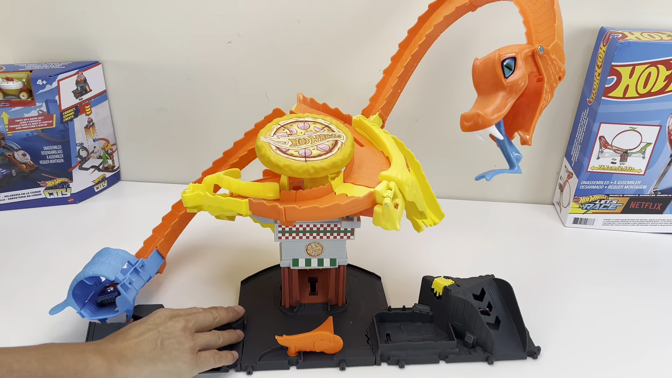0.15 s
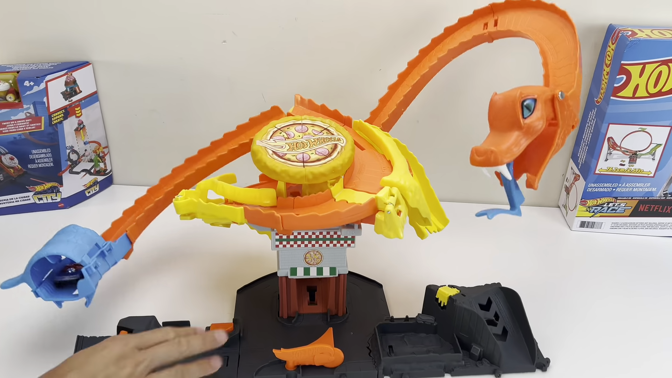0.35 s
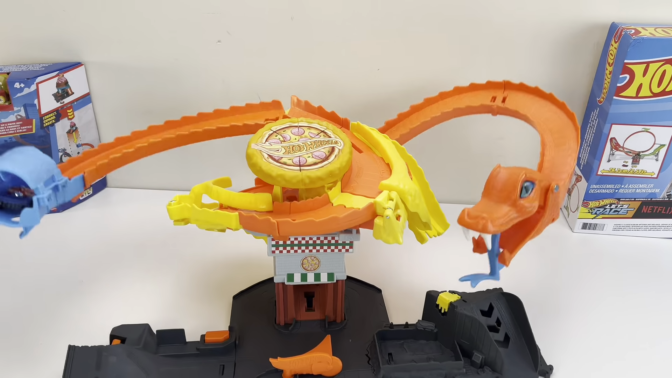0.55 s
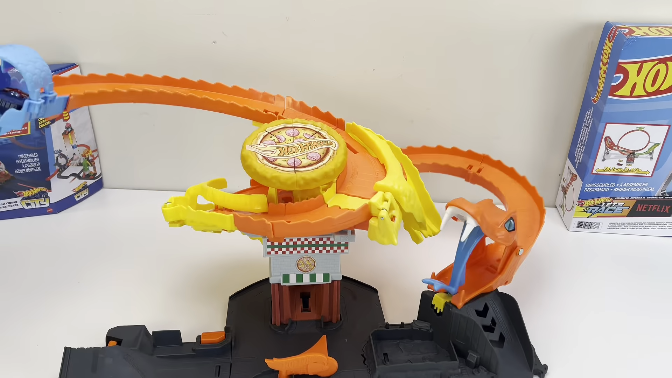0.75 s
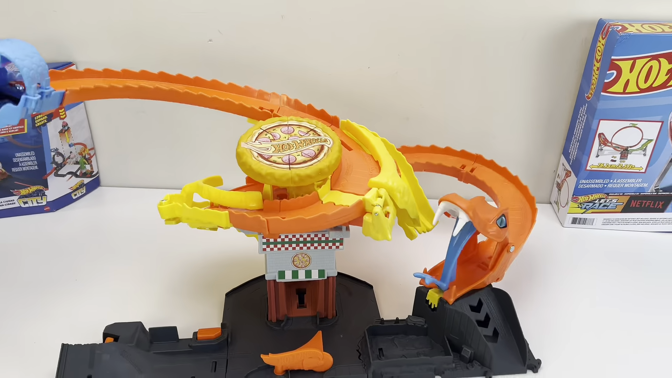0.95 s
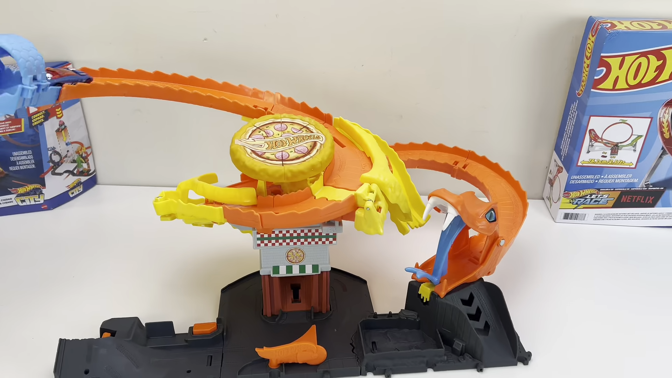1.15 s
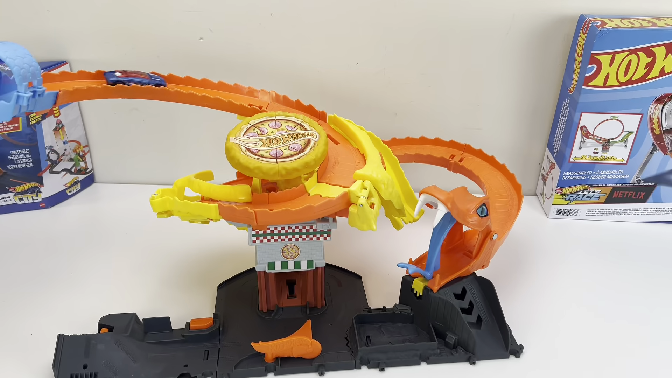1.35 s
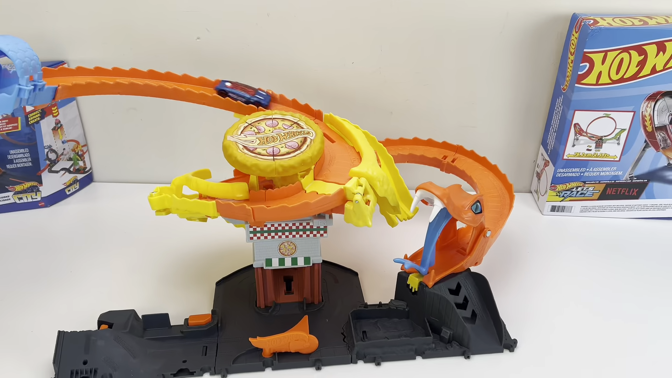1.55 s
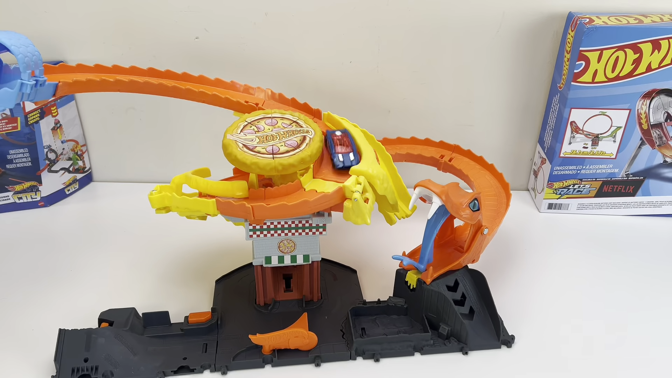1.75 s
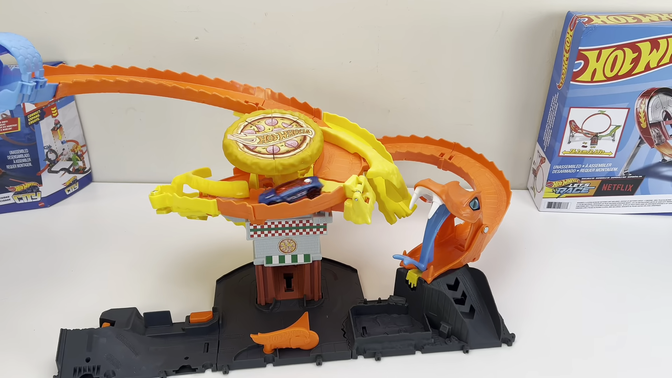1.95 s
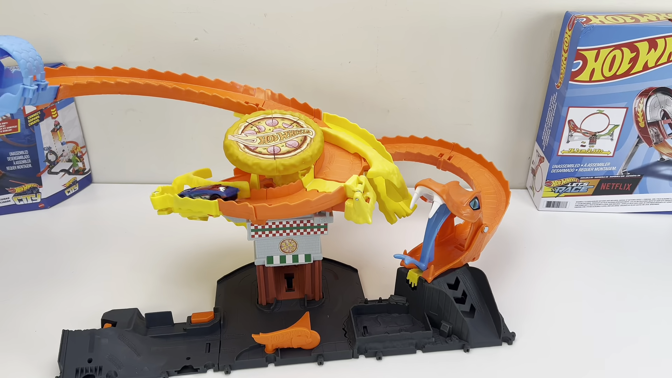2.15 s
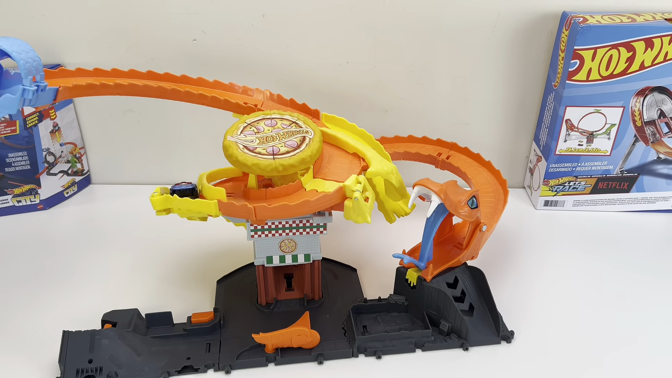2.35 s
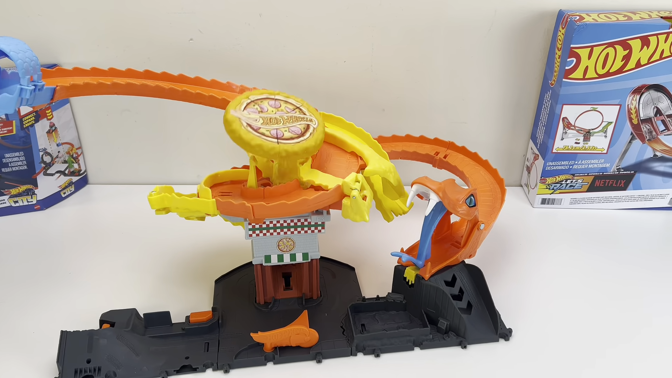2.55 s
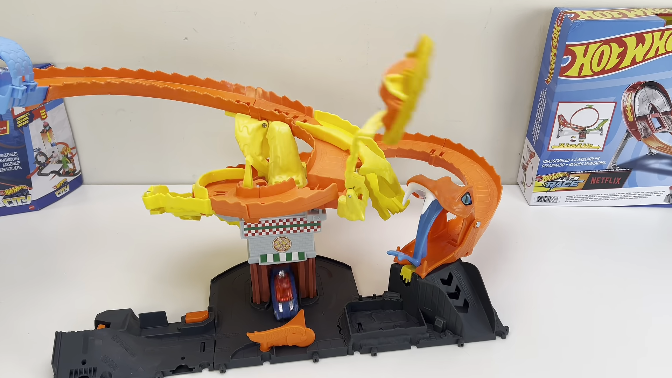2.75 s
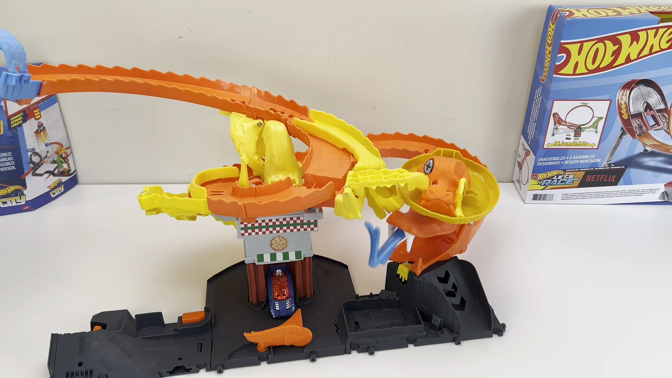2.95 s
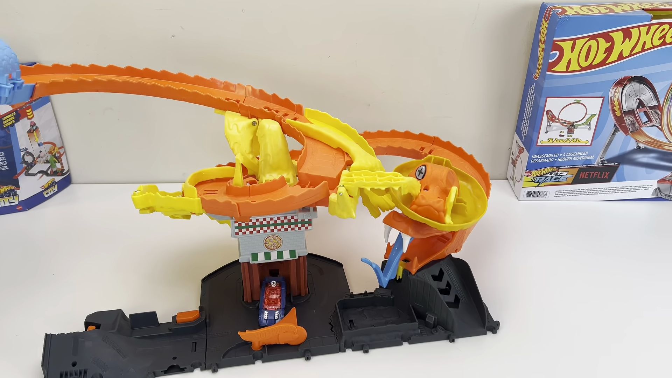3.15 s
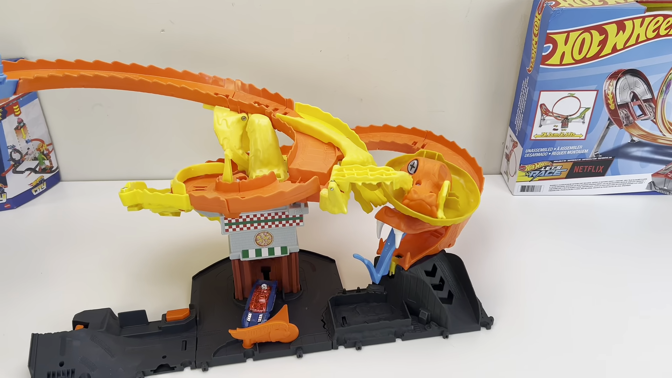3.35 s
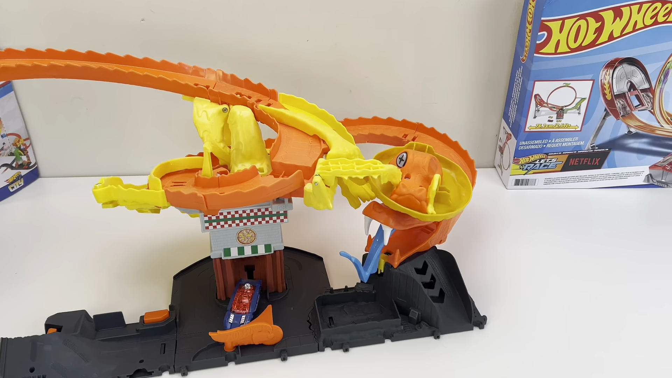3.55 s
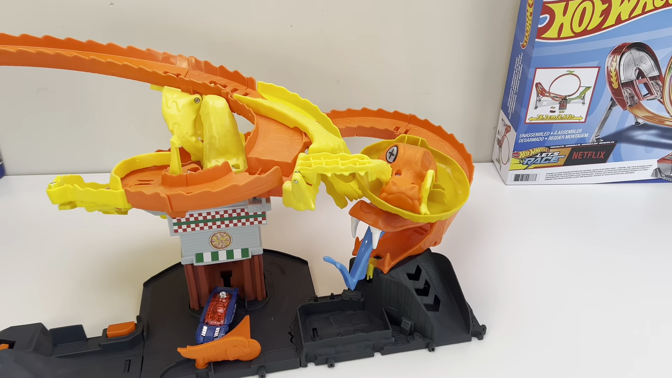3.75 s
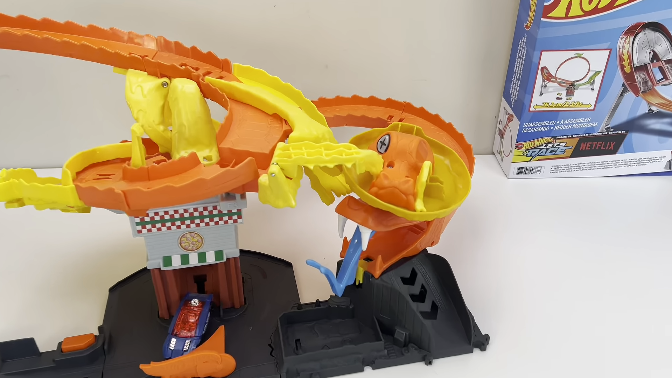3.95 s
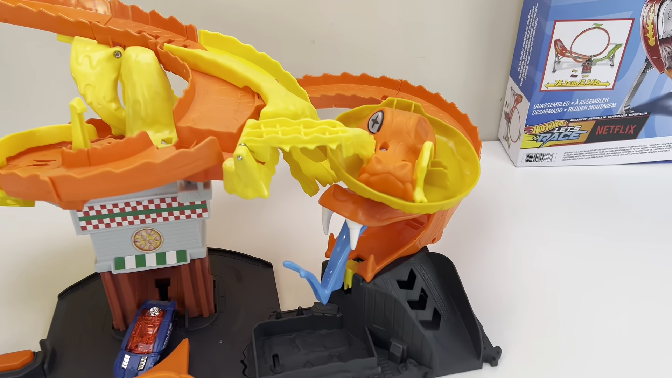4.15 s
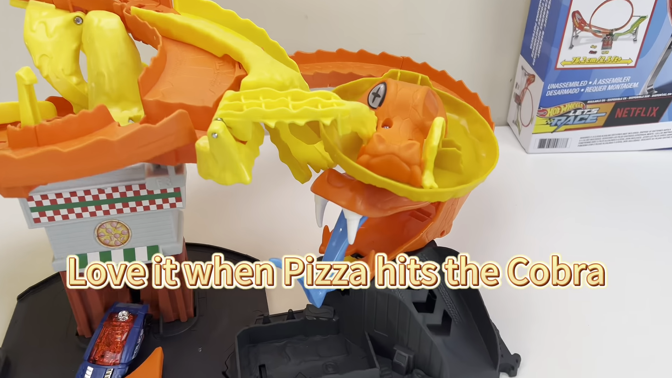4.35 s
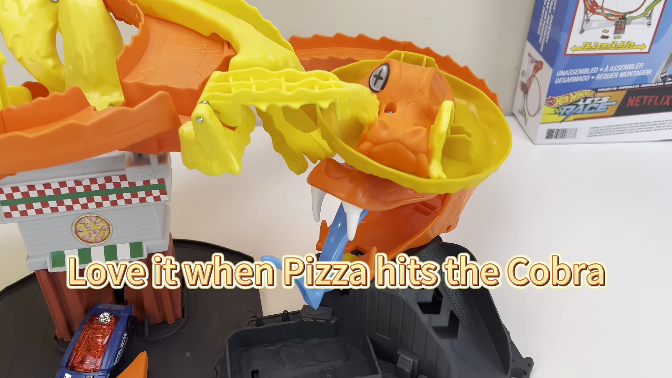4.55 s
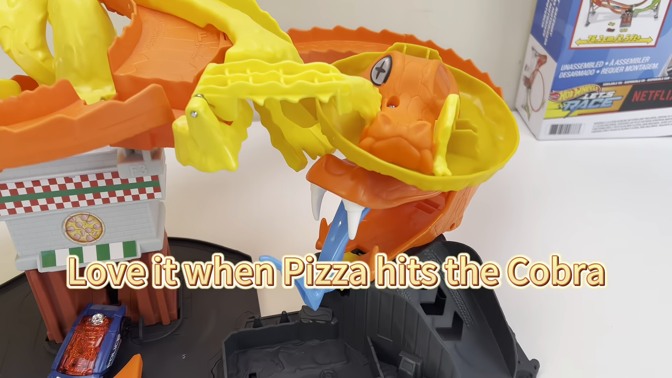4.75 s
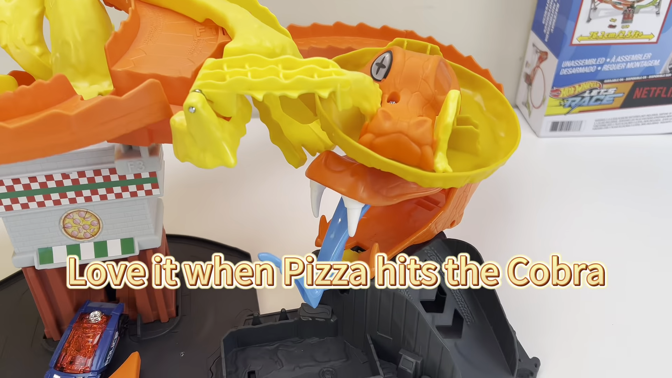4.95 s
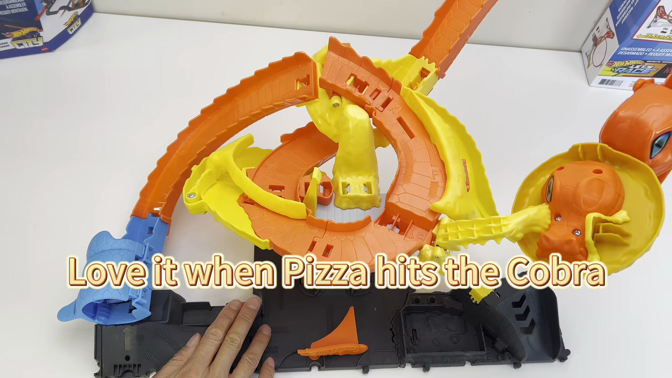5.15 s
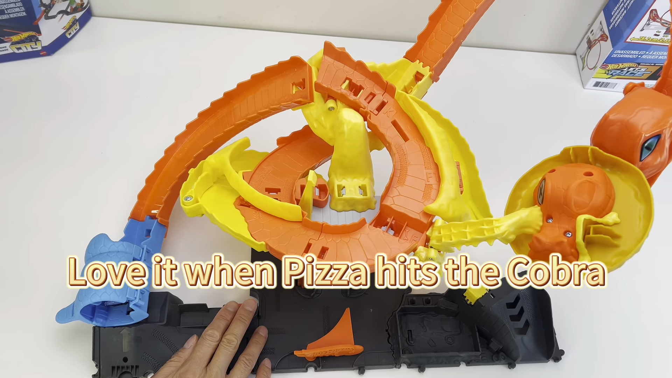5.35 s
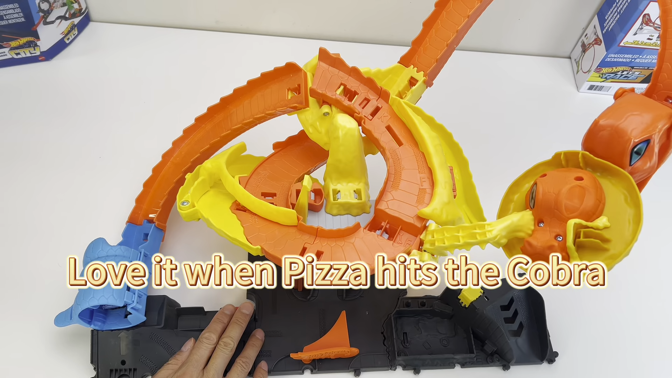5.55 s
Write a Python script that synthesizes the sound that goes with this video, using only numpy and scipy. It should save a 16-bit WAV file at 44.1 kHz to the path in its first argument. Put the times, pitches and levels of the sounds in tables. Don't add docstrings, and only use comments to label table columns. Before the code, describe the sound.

A plastic latch clicks, a hollow arm slams down, a small die-cast car rattles along plastic track, then a trap springs with a loud clatter.

```python
import sys
import numpy as np
from scipy import signal
from scipy.fft import rfft, irfft
from scipy.io import wavfile
from scipy.ndimage import uniform_filter1d

SR = 44100
rng = np.random.default_rng(int(sys.argv[2]) if len(sys.argv) > 2 else 0)


def voltage_ratio(decibels):
    exponent = np.asarray(decibels, float) / 20
    return 10 ** exponent


def waveform_to_disk(signal):
    frames = np.transpose(np.atleast_2d(signal))
    scaled = np.clip(frames, -1, 1) * 32767
    samples = np.round(scaled).astype(np.int16)
    wavfile.write(sys.argv[1], SR, samples)


N = 246078
TIME = np.arange(N) / SR


def curve(table, column=1):
    return np.interp(TIME, np.array(table)[:, 0], np.array(table)[:, column])


def along(points, size):
    hz = np.maximum(np.fft.rfftfreq(size, 1 / SR), 1)
    return np.interp(np.log(hz), np.log(np.array(points)[:, 0]), np.array(points)[:, 1])


def band(x, lo_hz, hi_hz, order=2):
    return signal.sosfilt(signal.butter(order, [lo_hz, min(hi_hz, .45 * SR)], "band", fs=SR, output="sos"), x)


def three_parts(x):
    hollow = band(x, 280, 1500)
    middle = -band(x, 1500, 4000)
    bright = band(band(x, 4000, 18000), 500, 13000, order=1)
    return hollow, middle, bright


def level(x, db=0):
    return x * voltage_ratio(db) / np.sqrt(np.mean(x ** 2))


def shaped_noise(spectrum):
    return irfft(rfft(rng.standard_normal(N)) * voltage_ratio(along(spectrum, N)), N)


def walk(rate_hz):
    hold = int(SR / rate_hz)
    steps = np.repeat(rng.standard_normal(N // hold + 1), hold)
    return 1.38 * uniform_filter1d(steps, hold)[:N]


def grit(size, spread_db):
    return rng.standard_normal(size) * voltage_ratio(spread_db * np.minimum(rng.exponential(size=size), 4.5))


# (start [s], wheel knock [dB], track rumble [dB], left minus right [dB])
STAGES = [
    (0.0, -7, 4, 3.5),
    (0.5, -11.5, 2, 3.5),
    (1.12, -1, -11.5, 4),
    (1.69, -13, -6.5, 3),
    (2.15, -20.5, -4, 3.5),
    (2.799, -14.5, 3.5, 4),
    (3.4, -15, 11, 12),
    (5.0, -14, 3, 7),
]


def stage(column):
    rows = np.array(STAGES)
    now = np.maximum(np.searchsorted(rows[:, 0], TIME, "right") - 1, 0)
    return uniform_filter1d(rows[now, column], size=int(.04 * SR) + 1)


# (frequency [Hz], density [dB per Hz])
HUM = [(18, -46), (30, -19), (59, -9), (90, -12), (124, -8), (280, -23), (584, -27.5), (822, -24),
       (1280, -28.5), (1460, -30), (2540, -31.5), (2900, -34.5), (16000, -51.5)]


def hum():
    mid = shaped_noise(HUM)
    side = 1.1 * band(shaped_noise(HUM), 300, 16000, order=1)
    settle_db = np.interp(TIME, [4.3, 4.6], [3.0, 0])
    return level(mid + side * np.array([[1], [-1]]), -64) * voltage_ratio(.6 * walk(14) + settle_db)


def room(x):
    t60_s, onset_s, shared, room_db = 0.36, 0.0057, 0.27, -11.5
    t = TIME[:SR]
    tails = rng.standard_normal((2, SR)) * np.exp(-np.log(1000) * t / t60_s) * np.minimum(t / onset_s, 1)
    tails = tails + shared * tails[::-1]
    tails = band(tails, 200, 6500, order=1) + 0.34 * tails * np.exp(-t / .08)
    return signal.fftconvolve(x[None], level(tails, room_db) / np.sqrt(SR), axes=1)[:, :N]


def near_echoes(x, echo_db):
    scatter = rfft(rng.standard_normal((2, 512)) * np.exp(-TIME[:512] / .002))
    allpass = irfft(scatter / np.abs(scatter))
    first, second = signal.fftconvolve(x[None], allpass, axes=1)[:, :N]
    angle_rad = 2.37 * walk(8.8)
    echo = band(first * np.cos(angle_rad) + second * np.sin(angle_rad), 1300, 14000, order=1)
    return voltage_ratio(echo_db) * echo * np.array([[1], [-1]])


# (loudest [s], mode [dB], wobble [dB], 60 dB decay [s])
TABLE = [(0.17, -54, -53.5, 0.21), (0.33, -46, -55, 0.25), (0.56, -47.5, -55.5, 0.23),
         (0.7, -28, -39.5, 0.16), (0.842, -29.5, -39.5, 0.28), (0.93, -37, -41.5, 0.14),
         (1.14, -52, -61.5, 1.8), (1.8, -60, -52.5, 1.1), (1.97, -41, -49.5, 0.5),
         (2.27, -45.5, -48.5, 0.44), (2.57, -40, -48, 0.23), (2.94, -23, -38, 0.22),
         (3.08, -37, -53.5, 0.51), (5.58, -49, -55, .3)]


def table_top():
    mode_hz, swell_db_per_s = 118, 331
    drifting_hz = mode_hz * (1 + 0.028 * walk(25))
    mode = np.sqrt(2) * np.sin(2 * np.pi * np.cumsum(drifting_hz) / SR)
    wobble = level(band(rng.standard_normal(N), 50, 140, order=3))
    wobble = wobble + level(band(rng.standard_normal(N), 160, 360))
    s, mode_db, wobble_db, decay_s = np.array(TABLE).T[:, :, None]
    late_s = TIME - s
    fall_db = np.where(late_s < 0, swell_db_per_s * late_s, -60 * late_s / decay_s)
    mode_gain = voltage_ratio((mode_db + fall_db).max(axis=0))
    wobble_gain = voltage_ratio((wobble_db + 0.38 * fall_db).max(axis=0))
    return mode_gain * mode + wobble_gain * wobble


def ringing(modes, widen, crack_db, detune):
    t = TIME[:4000]
    hz, width_hz, db = np.array(modes).T[:, :, None]
    hz = hz * (1 + detune * rng.standard_normal(hz.shape))
    width_hz = np.maximum(widen * width_hz, 110)
    ring = voltage_ratio(db) * np.sqrt(width_hz) * np.exp(-np.pi * width_hz * t) * np.cos(2 * np.pi * hz * t)
    return level(ring.sum(axis=0)) + level(1. * (t == 0), crack_db)


def blows(table, modes, widen, crack_db, ring_hz=1018, spot_hz=130):
    out, t = np.zeros(N + 12000), TIME[:6000]
    spot_db = max(mode[2] for mode in modes) + 3
    modes = list(modes) + [(ring_hz, spot_hz / widen, spot_db)]
    onset = np.minimum(t / .0012, 1)
    for s, peak_db, hollow_db, bright_db, chatter_ms in table:
        fade = np.exp(-(1000 * t / max(chatter_ms, 1)) ** 2) + .33 * np.exp(-t / 0.038)
        answer = ringing(modes, widen, crack_db, .015)
        parts = three_parts(signal.fftconvolve(grit(len(t), 3.5) * fade * onset, answer))
        peaks = [np.sqrt(uniform_filter1d(p ** 2, size=150).max()) for p in parts]
        mix = sum(voltage_ratio(db) * p / peak for p, peak, db in zip(parts, peaks, (hollow_db, 0, bright_db)))
        at = int(s * SR)
        out[at:at + len(mix)] += voltage_ratio(peak_db - 8.5) * mix
    return out[:N]


def knocks(table, modes, widen, crack_db, chatter_ms):
    out = np.zeros(N)
    for s, peak_db, hollow_db, bright_db, ring_hz in table:
        blow = (s, peak_db, hollow_db, bright_db, chatter_ms)
        out = out + blows([blow], modes, widen, crack_db, ring_hz)
    return out


# (frequency [Hz], width [Hz], level [dB])
LATCH_RING = [(870, 24, -21.5), (1080, 83, -14.5), (1210, 12, -3), (1630, 16, 1), (2720, 43, -8.5),
              (4070, 80, -14), (4860, 76, 7.5), (6030, 16, -15.5)]
# (time [s], peak [dB], hollow part [dB], bright part [dB], chatter [ms])
LATCH = [
    (0.0253, -60, 24, -33, 12.4),
    (0.1067, -29.5, -0.5, -12, 7.4),
    (0.1379, -35, 6.5, -11, 33),
    (0.277, -44.5, 7, -23, 44),
    (0.2963, -22, 6.5, -5.5, 14),
    (0.5325, -47.5, 6, -5.5, 81),
    (0.5632, -25, -10.5, -2, 6.7),
]


def latch():
    return blows(LATCH, LATCH_RING, 4.0, 0, ring_hz=1080, spot_hz=420)


# (time [s], peak [dB], hollow part [dB], bright part [dB], strongest ring [Hz])
HAND = [
    (3.3238, -48, 4, -30, 442.4),
    (5.4909, -56.5, -2, -6.5, 2800),
    (5.5575, -59, 7, -25, 450),
]
# (time [s], peak [dB], hollow part [dB], bright part [dB], strongest ring [Hz])
FURTHER_TAPS = [
    (3.515, -72, 3, -18, 900),
    (3.996, -63, -3, -8, 700),
    (5.272, -66, -15, -20, 3200),
]
# (time [s], peak [dB], hollow part [dB], bright part [dB], chatter [ms])
RUSTLE = [
    (5.198, -74, -2, -1, 45),
    (5.485, -66, -10, -2, 90),
]
# (frequency [Hz], width [Hz], level [dB])
BOWL_RING = [(1020, 170, -3), (1670, 510, 1.5), (2400, 30, 2), (3900, 121, -11), (3873, 23, -4),
             (4430, 27, -22), (5050, 87, -10), (6160, 120, -3.5), (6760, 39, -12)]


def hand():
    return knocks(HAND + FURTHER_TAPS, LATCH_RING, 6.45, -1.8, 4.6) + blows(RUSTLE, BOWL_RING, 6.0, 13)


# (frequency [Hz], width [Hz], level [dB])
ARM_RING = [(355, 32, -17), (480, 50, 17.5), (750, 79, 9), (1000, 17, 21.5), (1260, 31, -15.5),
            (1620, 37, -13.5), (2300, 68, -6), (2940, 60, -20.5), (4700, 300, -17)]
# (time [s], peak [dB], hollow part [dB], bright part [dB], chatter [ms])
SLAM = [(0.6524, -12, 8.5, -2, 19.1), (0.6674, -17, -30, -11, 12), (0.6994, -34, -15, -13.5, 19),
        (0.7354, -38.5, -1, -9, 6.7), (0.7604, -34.5, 7, -4, 5.3), (0.7856, -28, -3, 2.5, 6),
        (0.8011, -22, 5, 0.5, 11), (0.8174, -18.5, -1.5, -15.5, 13), (0.8314, -21.5, 3, -9, 15),
        (0.8694, -32.5, 12.5, -14, 19), (0.9244, -50, -5, -15, 6.3), (0.962, -28.5, -6, -7, 15.5),
        (0.9914, -62.5, 21, -5, 7)]


def arm():
    first = blows(SLAM[:3], ARM_RING, 2.2, 1.5, ring_hz=2520)
    bounces = blows(SLAM[3:], ARM_RING, 2.2, 1.5, spot_hz=250)
    return first + bounces


# (frequency [Hz], width [Hz], level [dB])
TRAP_RING = [(1010, 24, -3.5), (1750, 95, -6), (1982, 19, -17), (2510, 170, 12.5), (2660, 19, -20),
             (2982, 29, 6.5), (4100, 62, 4.5), (5270, 100, 11.5), (7840, 110, -22.5)]
# (time [s], peak [dB], hollow part [dB], bright part [dB], strongest ring [Hz])
TRAP = [(2.7671, -40, -13.5, 7, 1420), (2.7824, -29.5, -1.5, 7.5, 1390), (2.811, -16, 3, -5, 510),
        (2.818, -22, 12.5, -10, 1200), (2.8258, -24, -3, 9.5, 5370), (2.838, -22, 11, -5, 1020),
        (2.8804, -6, -2.5, -2.5, 2520), (2.8942, -11, 2.5, -1, 984.5), (2.9105, -11.5, 2.5, 5.5, 2660),
        (2.9309, -24, 7, -5, 480), (2.9488, -25.5, 6.5, -16.5, 2453), (2.9741, -33.5, 2.5, -16, 880),
        (3.0252, -19, 7, 4, 2695), (3.033, -29, 7.5, -5, 480), (3.0801, -23, -28, -8.5, 1760),
        (3.1266, -35, 13, -22, 2330)]


def trap():
    return knocks(TRAP, TRAP_RING, 3, 0.914, 9.5)


# (time [s], peak [dB], hollow part [dB], bright part [dB], strongest ring [Hz])
JOINTS = [(1.681, -29.5, -4, 4, 2990), (1.7235, -29, -7, -6, 2460), (1.7527, -21.5, -43, -10.5, 2400),
          (1.7944, -32, 3, -3, 4850), (1.8317, -32, 4.5, -11.5, 1180), (1.8724, -27, -1.5, -13, 2180),
          (1.89, -27, -32, 0.5, 1030), (1.9208, -29.5, 4.5, 7, 5000), (1.931, -30, 0, 4, 586),
          (1.9498, -18, -36, -6.5, 5400), (1.957, -24, -30, -8.5, 4100), (2.0152, -26.5, -3.5, -8.5, 436)]
BOWL = [
    (2.0964, -31, -7, -0.5, 2120),
    (2.174, -33, -21, -40, 2570),
    (2.1964, -29, -14, -4, 2640),
    (2.229, -29.5, 6.5, -0.5, 480),
    (2.2463, -23, -16, -5.5, 2660),
    (2.2643, -28, -4, 2.5, 2670),
    (2.3063, -34.5, -24, -2, 3660),
]
RIM = [
    (2.3544, -40.5, -20, 7.5, 1400),
    (2.4254, -29.5, 6, 9, 679.6),
    (2.442, -29.5, -17, -0.5, 3355),
    (2.4895, -34.5, 9, -21.5, 1000),
    (2.5356, -32, 5, 11, 1311),
    (2.5772, -23.5, -11, -2, 2510),
    (2.6114, -37, -12.5, -2.5, 1030),
    (2.7222, -42, -21, -5.5, 4060),
]


def bowl():
    stretches = (JOINTS, 12.5), (BOWL, 27), (RIM, 11.5)
    return sum(knocks(table, BOWL_RING, 1.9, 0, chatter_ms) for table, chatter_ms in stretches)


# (frequency [Hz], width [Hz], level [dB])
CAR_RING = [(1750, 200, -11), (2720, 130, 0), (3020, 130, -3), (4080, 250, -12), (5000, 200, -3),
            (5640, 250, -11), (8200, 300, -18)]
# (time [s], peak [dB], hollow part [dB], bright part [dB], strongest ring [Hz])
RAMP = [(1.093, -30, -19, 10, 2760), (1.1101, -37.5, 4.5, -4.5, 2750), (1.224, -30.5, -11, 1, 2720),
        (1.3346, -29.5, -9, -10.5, 2720), (1.3578, -23, -20, -3.5, 2960), (1.4012, -34.5, -20, 14, 5000),
        (1.4194, -25, -20, -9, 3365), (1.434, -30.5, -18, -6.5, 5390), (1.491, -27, -29, -21.5, 2650),
        (1.5346, -25, -28, -10.5, 2730), (1.5525, -23.5, -41, -12, 2670), (1.5683, -30.5, -35, -12, 2940),
        (1.5951, -30.5, -11, 3.5, 3000), (1.6243, -60.5, -30, 36, 2880)]


def ramp():
    return knocks(RAMP, CAR_RING, .9, -1.5, 13)


# (time [s], level [dB])
ROLL = [(0.53, -67.5), (0.62, -66), (0.74, -49.5), (0.85, -44.5), (1.0, -52.5), (1.17, -54.5), (1.36, -46),
        (1.51, -41.5), (1.6, -45.5), (1.76, -31.5), (1.88, -40.5), (2.02, -41), (2.11, -47.5), (2.84, -40),
        (2.95, -30), (3.02, -46.5), (3.12, -46), (3.2, -58.5)]
# (frequency [Hz], density [dB per Hz])
WHEELS = [(120, -43), (200, 1), (750, -12.5), (1050, -3.5), (2500, -2), (5000, -3), (8500, -16),
          (15000, -12.5), (16500, -39)]
# (time [s], share [0-1])
ON_RAMP = [(1.0, .1), (1.1, .85), (1.64, .85), (1.69, .15), (2.7, .1)]


def rolling():
    contact = grit(N, 2.5) * voltage_ratio(2.5 * walk(110) + 1.2 * walk(30))
    share = np.clip(curve(ON_RAMP), 0, 1)
    rest = np.sqrt(1 - share ** 2)
    body = three_parts(signal.fftconvolve(contact, ringing(CAR_RING, .8, -4, 0))[:N])
    track = three_parts(irfft(rfft(contact) * voltage_ratio(along(WHEELS, N)), N))
    wheels, fine = (share * level(body[k]) + rest * level(track[k]) for k in (1, 2))
    rumble = level(track[0]) * voltage_ratio(1.8 * walk(30))
    moving = (TIME > SLAM[0][0]) * np.exp(-np.maximum(TIME - ROLL[-1][0], 0) / 0.07)
    mix = voltage_ratio(stage(column=1)) * wheels + voltage_ratio(stage(column=2)) * rumble + fine
    return moving * voltage_ratio(curve(ROLL)) * mix


def scene():
    toy = latch() + arm() + ramp() + bowl() + trap() + hand() + rolling()
    pan_db = stage(column=3) * np.array([[.5], [-.5]])
    heard = toy + near_echoes(toy, -0.5) + room(toy)
    table = table_top() * voltage_ratio(np.array([[1.1], [-1.1]]))
    return voltage_ratio(pan_db) * heard + table + hum()


# (from [s], to [s])
HUSH_S = [(3.43, 3.63), (4.47, 5.195), (5.3, 5.46)]


def hushed(x):
    shut = uniform_filter1d(1. * sum((TIME > a) & (TIME < b) for a, b in HUSH_S), size=3500)
    treble = signal.sosfiltfilt(signal.butter(3, 1500, "high", fs=SR, output="sos"), x)
    return x - (1 - voltage_ratio(-8)) * shut * treble


def thinned(x, gaps, keep_db):
    hz = np.fft.rfftfreq(N, 1 / SR)
    inside = sum((hz > lo) & (hz < hi) for lo, hi in gaps)
    return irfft(rfft(x) * voltage_ratio(keep_db * uniform_filter1d(1. * inside, size=2500)), N)


def top_cut(x):
    return signal.sosfilt(signal.butter(12, 16640, fs=SR, output="sos"), x)


# (low [Hz], high [Hz])
MID_GAPS = [(9150, 11050), (15200, 22050)]
SIDE_GAPS = [(12400, 15300), (15900, 22050)]


def record(dry):
    top = signal.ellip(8, .2, 60, 16400, fs=SR, output="sos")
    left, right = signal.sosfilt(top, np.tanh(0.9 * hushed(dry)) / 0.9)
    mid = thinned(left + right, MID_GAPS, -18) / 2
    side = thinned(left - right, SIDE_GAPS, -11.5) / 2
    return top_cut(np.array([mid + side, mid - side]))


dry = scene()
out = record(dry)
waveform_to_disk(out)
```